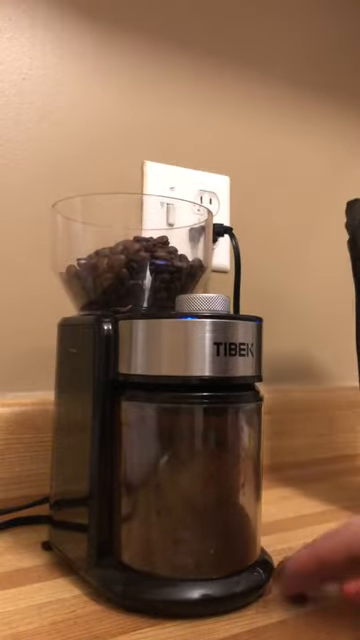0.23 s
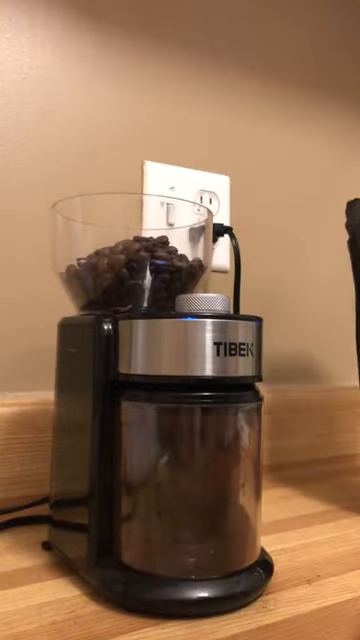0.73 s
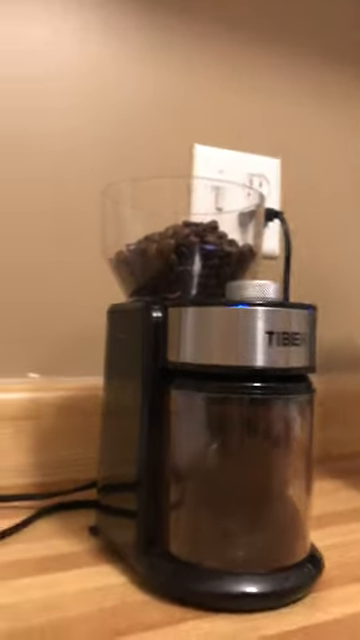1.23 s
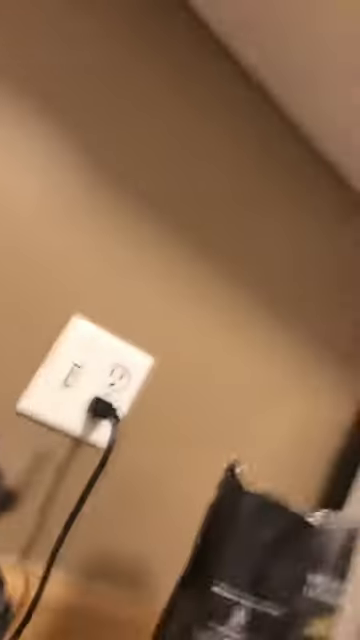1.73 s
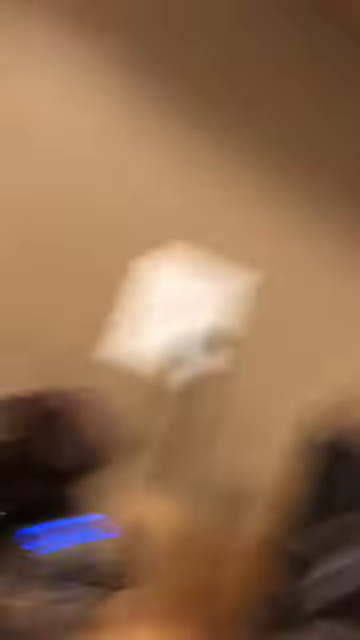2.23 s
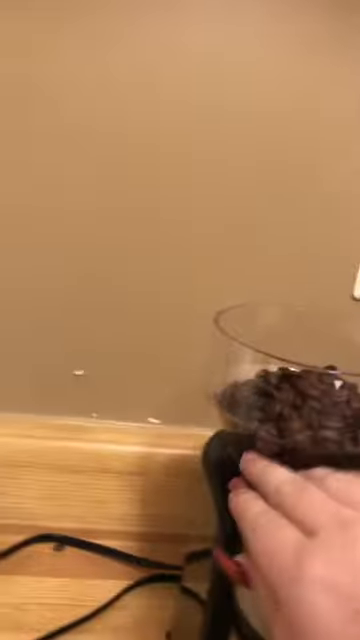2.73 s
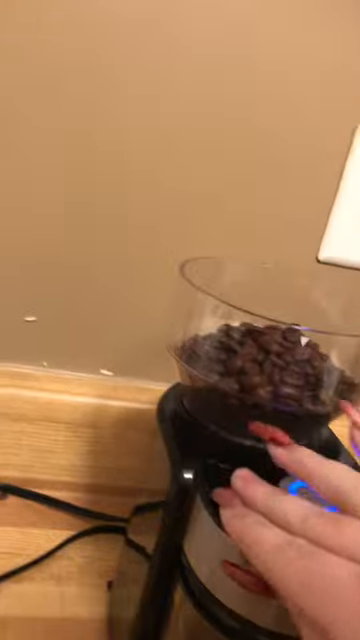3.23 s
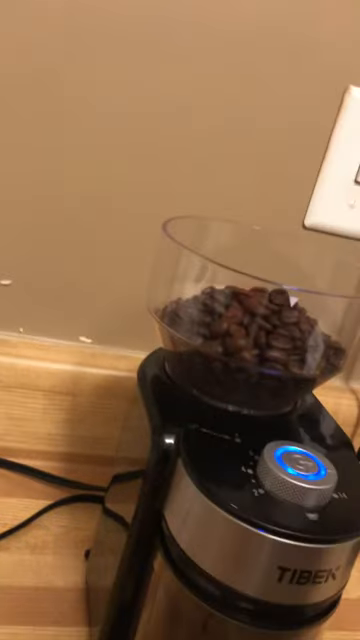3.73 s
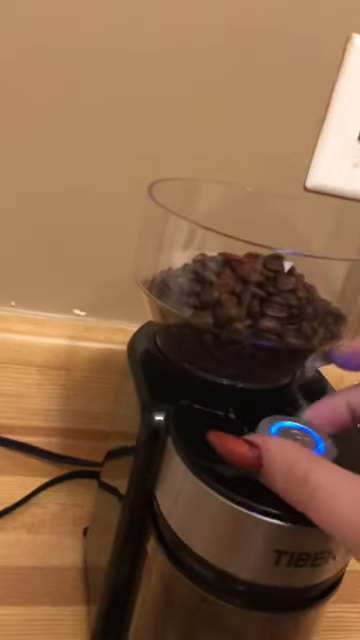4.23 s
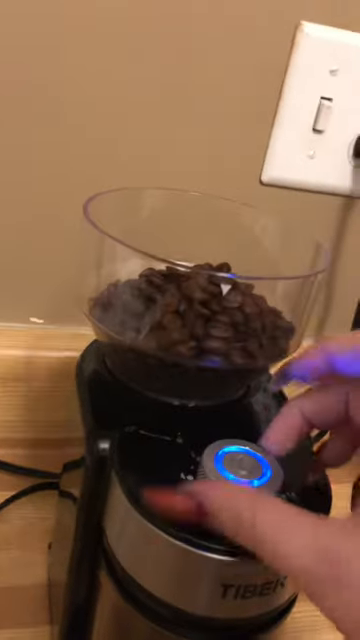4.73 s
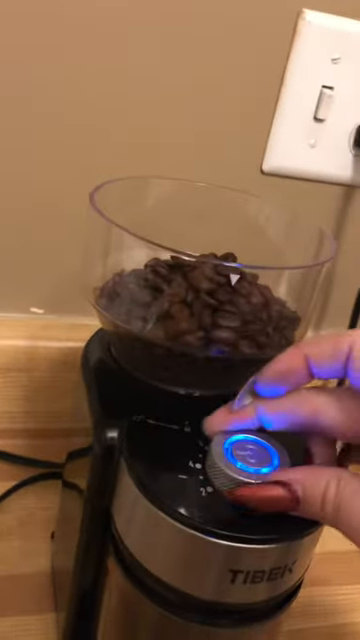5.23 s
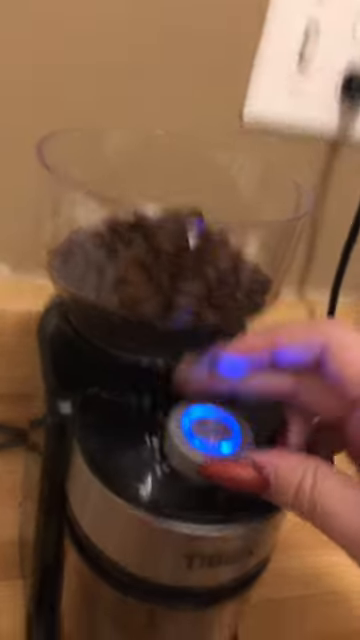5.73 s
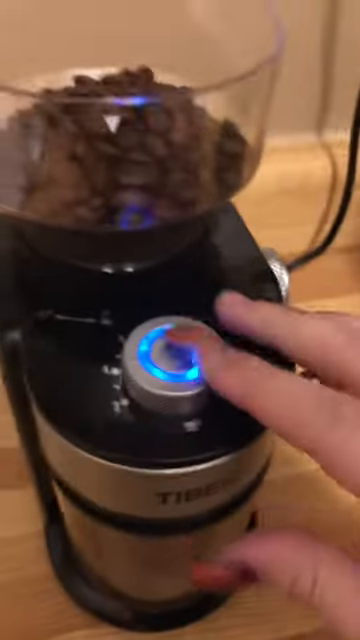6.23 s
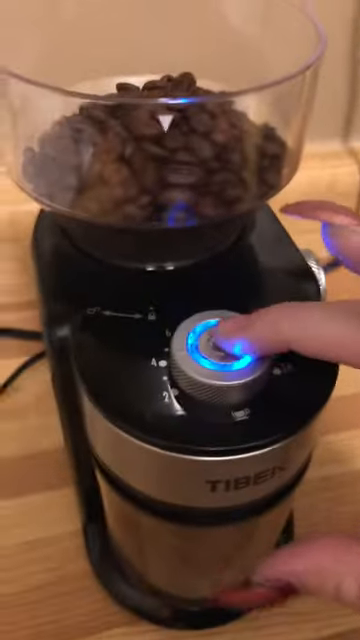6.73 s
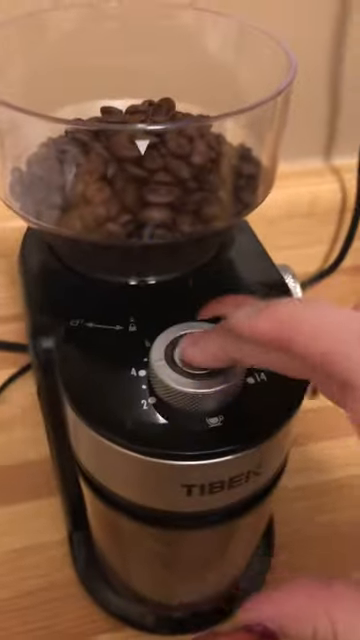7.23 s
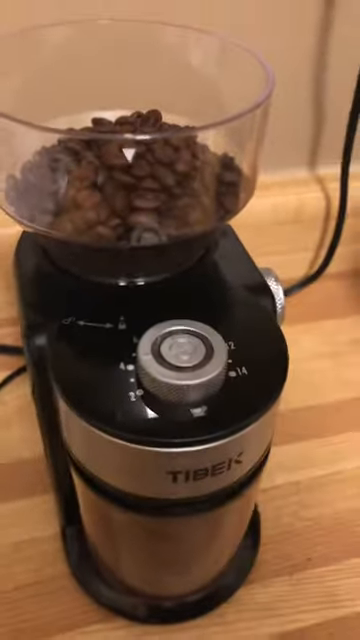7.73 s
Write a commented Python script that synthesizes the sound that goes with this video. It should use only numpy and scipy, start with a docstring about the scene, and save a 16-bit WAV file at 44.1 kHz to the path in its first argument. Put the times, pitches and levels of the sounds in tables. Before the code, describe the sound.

Mostly quiet handling at first: soft sliding skin and sleeve, muffled bumps. A small hard bean raps plastic three or four times, followed by bright nail taps. A dial zips through a fast burst of clicks, pauses, then clicks back, slowing to single teeth. More nails, a low button click, a short metallic spring ping, and low thumps. Close microphone, small room.

```python
"""Coffee grinder readied on a kitchen counter

Heard close up on a hand-held phone, in a small kitchen over still air, a steady hiss and a faint mains hum.
A stray bean bounces into the hopper and fingernails tick on the casing: noise through plastic resonances.
The grind dial ratchets up and back; the button goes down, its spring pings (decaying sines), it comes back.
Shaped noise makes the sliding sleeves and hand; soft bumps are short damped sines, squeaks wavering ones."""
import sys
import numpy as np
from scipy import signal
from scipy.fft import rfft, irfft, next_fast_len
from scipy.io import wavfile
from scipy.ndimage import uniform_filter1d

SR = 44100
rng = np.random.default_rng(int(sys.argv[2]) if len(sys.argv) > 2 else 0)


def generate_wav(sig):
    """Save sig (samples, or channels by samples) to the path in sys.argv[1] as 16-bit PCM at SR."""
    pcm = np.round(np.clip(np.atleast_2d(sig).T, -1, 1) * 32767).astype(np.int16)
    wavfile.write(sys.argv[1], SR, pcm)


N = 352359  # samples


def amp(db):
    """Decibels to gain."""
    return 10 ** (np.asarray(db) / 20)


def unit(x):
    """x at rms 1."""
    return x / np.sqrt(np.mean(x ** 2) + 1e-20)


def along(points, hz):
    """Values at hz, from (pitch_hz, value) points joined on a log frequency axis."""
    f, v = np.transpose(points)
    return np.interp(np.log(hz + 1), np.log(f), v)


def filtered(x, response):
    """x times a response of frequency."""
    m = next_fast_len(len(x) + 1024)
    gain = response(np.fft.rfftfreq(m, 1 / SR))
    return irfft(rfft(x, m) * gain, m)[:len(x)]


def coloured(x, spectrum):
    """x weighted by a (pitch_hz, level_db) spectrum, at rms 1."""
    return unit(filtered(x, lambda hz: amp(along(spectrum, hz))))


def clock(size=SR // 4):
    """Seconds from the start of a sound."""
    return np.arange(size) / SR


def add(track, s, sound):
    """Mix a sound into the track at s seconds."""
    part = track[round(s * SR):][:len(sound)]
    part += sound[:len(part)]


# Decay of the small kitchen around the phone: pitch_hz, t60_s
KITCHEN_DECAY = [(200, 0.44), (2000, 0.26), (5500, 0.22), (15000, 0.16)]


def in_room(sound, room_db):
    """A sound with the kitchen's answer: a noise tail in which treble dies first."""
    hz, t, z = signal.stft(rng.standard_normal(len(sound)), SR, nperseg=256)
    decay = amp(-60 * t / along(KITCHEN_DECAY, hz)[:, None])
    tail = signal.istft(z * decay * (t > 0), SR, nperseg=256)[1]
    answer = signal.fftconvolve(sound, tail / np.linalg.norm(tail))[:len(sound)]
    return sound + amp(room_db) * answer


# Colour of the still kitchen air at the microphone: pitch_hz, relative level_db
AIR_SPECTRUM = [(25, -10.5), (50, -2), (130, -3), (400, -6.5), (750, -15), (1400, -19.5), (3200, -27.5),
                (11600, -29.5), (16000, -30.5)]


def room_tone(air_db=-64, hum_db=-69, hum_hz=120):
    """Still air as steady coloured noise, and a faint mains hum as one sine."""
    hum = unit(np.sin(2 * np.pi * hum_hz * clock(size=N)))
    air = coloured(rng.standard_normal(N), AIR_SPECTRUM)
    return amp(air_db) * air + amp(hum_db) * hum


# Faint squeaks somewhere in the room: start_s, level_db, pitch_hz
FAINT_SQUEAKS = [(.885, -63, 2640), (7.351, -59, 2565)]


def squeaks(length=0.047, waver=0.014):
    """A thin tone of unsteady pitch that swells and fades over its length in seconds."""
    track = np.zeros(N)
    fade = np.sin(np.pi * np.minimum(clock() / length, 1))
    for s, db, hz in FAINT_SQUEAKS:
        wander = unit(uniform_filter1d(rng.standard_normal(len(fade)), 150))
        pitch = hz * (1 + waver * wander)
        tone = np.sin(2 * np.pi * np.cumsum(pitch) / SR)
        add(track, s, in_room(amp(db) * fade * tone, room_db=-13))
    return track


# drop at both ends of a movement, share of its length before the peak, roundness
SWELL_DROP_DB, SWELL_SHARE, SWELL_POWER = 9.5, 0.59, 1.33


def swell(peak, length):
    """Gain of one hand movement, per sample: it gathers speed up to the peak, then trails off."""
    t = clock(size=N) - peak
    away = np.maximum(-t / SWELL_SHARE, t / (1 - SWELL_SHARE)) / length
    return amp(-SWELL_DROP_DB * np.minimum(away, 10) ** SWELL_POWER)


def effort(rows):
    """Summed gain of (peak_s, length_s, level_db) movements."""
    return sum(amp(db) * swell(s, length) for s, length, db in rows)


def friction(grain_db, size=60):
    """Noise broken into tiny catches of random strength; size is their smoothing in samples."""
    catches = unit(uniform_filter1d(rng.standard_normal(N), size))
    return rng.standard_normal(N) * amp(grain_db * catches)


# Colour of skin and cloth sliding, and of the steady hiss: pitch_hz, relative level_db
SLIDE_SPECTRUM = [(150, -17), (350, -3), (900, -9.5), (1700, -6.5), (3500, -5), (7800, -12), (16000, -25)]
# Hand and sleeve sliding past the phone: peak_s, length_s, level_db, hiss_over_rustle_db
SLIDE_MOVES = [(0.146, 0.13, -64.5, -10), (0.38, 0.31, -52.5, -4.5), (0.627, 0.45, -61.5, -11.5),
               (1.147, 0.24, -70, -6), (1.669, 0.038, -59, -2), (1.95, 0.13, -56.5, 6),
               (2.167, 0.042, -51, -1.5), (2.854, 0.39, -63, 1), (3.22, 0.21, -74.5, 8),
               (5.68, 0.049, -56, -13), (6.018, 0.134, -66, 1), (6.11, 0.038, -56, 0.5),
               (6.419, 0.031, -58.5, 14), (7.301, 0.024, -54.5, -7), (7.72, .17, -60, 2)]
STEADY_HISS_DB = -73  # a faint, steady broadband hiss under everything


def rustle(grain_db=1.5):
    """Skin and cloth slide as broad rustle with a finer hiss above; the same noise is a faint steady hiss."""
    slide = coloured(friction(grain_db, size=200), SLIDE_SPECTRUM)
    low = filtered(slide, lambda hz: 1 / (1 + (hz / 5500) ** 6))
    broad, hiss = unit(low), unit(slide - low)
    track = amp(STEADY_HISS_DB) * slide
    for s, length, db, hiss_db in SLIDE_MOVES:
        track += amp(db) * swell(s, length) * (broad + amp(hiss_db) * hiss)
    return track


# Colour of the palm's rubbing: pitch_hz, relative level_db
PALM_SPECTRUM = [(120, -10.5), (250, 0.5), (520, 1.5), (800, -6.5), (1150, -13), (1500, -8.5), (2700, -24),
                 (4000, -15.5), (7000, -29), (15000, -44.5)]
# The palm rubbing on phone and grinder: peak_s, length_s, level_db
PALM_RUBS = [(.55, .4, -66), (.997, 0.027, -50), (1.13, 0.25, -61), (1.58, .12, -53), (1.76, .08, -56.5),
             (2.03, .18, -60.5), (2.165, .05, -54), (2.24, .04, -59), (3.34, .06, -56.5),
             (4.46, .08, -48.5), (7.76, .2, -61.5)]
# The hand's weight rocking the grinder: peak_s, length_s, level_db
HAND_LEANS = [(2.69, 0.066, -57), (2.79, 0.06, -56), (4.4, .28, -54), (4.72, .09, -53.5), (6.95, .35, -60)]


def grip():
    """The palm rubs dully, as catching noise, and the rocked grinder rumbles on the counter."""
    rub = coloured(friction(grain_db=3.5, size=900), PALM_SPECTRUM)
    counter = [(25, -10.5), (50, -3.5), (100, -4), (200, -15.5), (600, -47), (2000, -75.5)]
    rumble = coloured(rng.standard_normal(N), counter)
    return effort(PALM_RUBS) * rub + effort(HAND_LEANS) * rumble


# Soft bumps of hands on phone and grinder: start_s, peak level_db of the push, pitch_hz
HAND_BUMPS = [(.905, -50.5, 222), (.988, -44, 215), (1.027, -50, 200), (1.127, -49.5, 179),
              (1.655, -47, 75.4), (1.684, -47.5, 158), (2.002, -50.5, 197), (2.222, -48.5, 495),
              (3.32, -46.5, 135), (3.344, -46, 61), (6.93, -45, 125), (7.01, -46, 121), (7.659, -34.5, 94),
              (7.763, -29, 88.5), (7.801, -33, 47.6)]
BUMP_CYCLES = 19  # cycles in which a bump's decay falls 60 dB


def bumps(rough=0.68, rise=0.0024):
    """A soft push swells over a few milliseconds, then dies away as a low sine with rough rumble."""
    t, track = clock(), np.zeros(N)
    for s, db, hz in HAND_BUMPS:
        rumble = unit(filtered(rng.standard_normal(len(t)), lambda f: 1 / (1 + (f / (2 * hz)) ** 2) ** 2))
        push = (1 - np.exp(-t / rise)) ** 2 * amp(-60 * t * hz / BUMP_CYCLES)
        tone = np.sin(2 * np.pi * hz * t)
        add(track, s, amp(db) * push / push.max() * (tone + rough * rumble))
    return track


def resonance(modes, hz):
    """Response of a part's (pitch_hz, width_hz, level_db) modes, neighbours in opposite sign."""
    total = 0
    for k, (centre, width, db) in enumerate(modes):
        damping = 1j * hz * width
        total = total + (-1) ** k * amp(db) * damping / (centre * centre - hz * hz + damping)
    return total


def contact(grain, modes, bands, levels, thud_db, crack, ring_t60, ring_db):
    """A hard crack and short ring through a part's resonances, each register set to its own level."""
    t, out = clock(size=len(grain)), np.zeros(len(clock()))
    # the low thud follows the strength of the body register
    for band, db in zip(bands, [levels[0] + thud_db, *levels]):
        age = t * (np.mean(band) / 5000) ** .3  # plastic damps its treble sooner
        decay = np.exp(-(age / crack) ** 2) + amp(ring_db - 60 * age / ring_t60)
        ringing = filtered(grain * decay, lambda hz: resonance(modes, hz))
        part = signal.sosfilt(signal.butter(3, band, "band", fs=SR, output="sos"), ringing)
        # level is rms over the first hundredth of a second
        out[:len(part)] += amp(db) * part / np.std(part[:SR // 100])
    return out


# Registers of a blow, from thud through body and snap to edge: low_hz, high_hz
TAP_REGISTERS = [(200, 900), (900, 2500), (2500, 7500), (7500, 16000)]


def taps(rows, modes, body_db, softening, thud_db, crack, ring_t60, ring_db, room_db, shake=0):
    """Blows on one plastic part, each with fresh noise; a harder one has more edge and less body."""
    track = np.zeros(N)
    for s, db, hardness in rows:
        # a softer contact also ends lower in the treble
        top_hz = np.clip(19000 * amp(hardness / 2.7), 9000, 19000)
        lowpass = signal.butter(4, top_hz, fs=SR, output="sos")
        grain = signal.sosfilt(lowpass, rng.standard_normal(SR // 16))
        levels = [db + body_db - softening * hardness, db, db + hardness]
        thud = thud_db + shake * hardness  # a hard blow can shake the whole machine
        blow = contact(grain, modes, TAP_REGISTERS, levels, thud, crack, ring_t60, ring_db)
        add(track, s, in_room(blow, room_db))
    return track


# Moments when the fingers are busy: start_s, end_s
FIDGET_SPANS = [(3.72, 3.8), (3.949, 4.04)]
GRAZE_DB, GRAZE_HARDNESS_DB = -51.5, -8


def grazes(count=2, scatter_db=3.0):
    """Rows of faint nail ticks at random moments of each fidget."""
    rows = []
    for start, end in FIDGET_SPANS:
        for _ in range(count):
            rows.append((rng.uniform(start, end), rng.normal(GRAZE_DB, scatter_db), GRAZE_HARDNESS_DB))
    return rows


# Fingernails on casing and knob: start_s, level_db of the snap, hardness_db of edge over snap
NAIL_TICKS = [(.2246, -52, -9), (.4537, -54, -3), (.9885, -57.5, -20), (3.3164, -38, 2), (3.4335, -28.5, 7),
              (3.5262, -39, 0), (3.5875, -43, 2), (3.6161, -45, -2.5), (3.7152, -35, -0.5),
              (3.8355, -35, -3), (3.9284, -38, 1.5), (3.9924, -43.5, -5), (4.079, -47.5, -11),
              (4.1831, -53, -18), (4.4348, -38.5, -12), (4.4769, -48, -12), (4.5067, -44.5, -14),
              (4.652, -62, -2), (4.72, -60, -2), (5.6707, -48, -28), (5.829, -36, -1), (6.2682, -39, -8),
              (6.3773, -41.5, -7), (6.4344, -44, -3), (6.5699, -51.5, -13), (6.5987, -42, -3),
              (6.6411, -40.5, -4.5), (6.7636, -46.5, -14), (6.779, -51, -17), (6.9756, -50, -7)]
# Resonances of the plastic casing: pitch_hz, width_hz, relative level_db
CASING_MODES = [(366, 300, -15), (1600, 650, -5.5), (3060, 1270, -4), (4330, 1390, 2), (6800, 6400, -2),
                (9200, 2800, 0.5), (13100, 2400, -2.5)]


def nails():
    """Long fingernails tick on the casing, ringing its broad plastic resonances."""
    return taps(NAIL_TICKS + grazes(), CASING_MODES, body_db=-7.5, softening=0.344, thud_db=-9.5,
                crack=0.0021, ring_t60=0.054, ring_db=-3.0, room_db=-10.0, shake=.75)


# The bean bouncing in the hopper: start_s, level_db of the snap, hardness_db of edge over snap
BEAN_BOUNCES = [(2.5908, -27, -6), (2.6312, -31, -4.5), (2.7262, -27.5, -12), (2.7773, -47, -14)]
# Resonances of the hopper: pitch_hz, width_hz, relative level_db
HOPPER_MODES = [(1260, 400, -16.5), (1880, 920, -14.5), (3250, 730, -9), (4030, 700, -4), (5150, 660, 1.5),
                (6200, 1100, -7), (8500, 1800, -12.5), (13000, 4200, -22)]


def bean():
    """The dropped bean strikes the hopper several times, through the hopper's resonances."""
    return taps(BEAN_BOUNCES, HOPPER_MODES, body_db=-30.0, softening=1.63, thud_db=-22,
                crack=.0018, ring_t60=0.064, ring_db=-15.0, room_db=-11)


# The button going down and coming back: start_s, level_db of the snap, hardness_db of edge over snap
BUTTON_CLICKS = [(6.8483, -57, -29), (6.9075, -35, -6), (7.2248, -41, 3.5), (7.2328, -45, -4),
                 (7.2402, -43.5, -14)]
# Resonances of the switch: pitch_hz, width_hz, relative level_db
SWITCH_MODES = [(296, 117, -0.5), (747, 130, 1), (1140, 350, -6.5), (1450, 266, 3), (2020, 450, -1.5),
                (2930, 420, -13.5), (4200, 610, -9), (8700, 490, -10), (12000, 3500, -19)]


def button():
    """The button's contacts ring the switch, mostly in its low body."""
    return taps(BUTTON_CLICKS, SWITCH_MODES, body_db=7.5, softening=0.24, thud_db=-7.0,
                crack=0.0016, ring_t60=0.039, ring_db=-2.5, room_db=-15.0)


# Modes of the spring under the button: pitch_hz, relative level_db, t60_s
SPRING_MODES = [(720, -10, 0.2), (770, 5.5, 0.15), (2966, -11, 0.081), (3820, 3, 0.041), (4890, -12, 0.045),
                (5400, -5, 0.071), (6200, -16, .06)]


def spring(s=7.021, ping_db=-33, tick_db=-31.5, tick_t60=0.05):
    """A spring under the button pings with a noisy tick; its two lowest modes beat."""
    t, track = clock(), np.zeros(N)
    ring = sum(amp(db - 60 * t / t60) * np.sin(2 * np.pi * hz * t) for hz, db, t60 in SPRING_MODES)
    tick_spectrum = [(500, -9), (3000, -5.0), (7000, -0.5), (9000, -11.5), (16000, -14)]
    tick = coloured(rng.standard_normal(len(t)), tick_spectrum)
    onset = 1 - np.exp(-t / 0.0025)
    ping = amp(ping_db) * ring * onset + amp(tick_db - 60 * t / tick_t60) * tick
    add(track, s, in_room(ping, room_db=-15.5))
    return track


# Resonances of the grind dial: pitch_hz, width_hz, relative level_db
DIAL_MODES = [(1468, 290, -11.5), (2254, 516, -3.5), (2962, 740, -10), (5300, 856, -1), (8010, 970, 2.5),
              (9900, 1700, -2.5), (13200, 1100, -1.5), (14500, 600, 0), (15450, 440, 2.5)]
# Registers of a tooth's click, from thud through body and snap to edge: low_hz, high_hz
DIAL_REGISTERS = [(200, 950), (1230, 4200), (4200, 12000), (12000, 16500)]
TOOTH_SCATTER_DB = 0.37  # level spread from tooth to tooth
# the pawl sounds brighter low on the scale: mean, swing either way, tooth of changeover, teeth it takes
BRIGHT_DB, BRIGHT_SWING_DB, BRIGHT_TOOTH, BRIGHT_WIDTH = 0.3, 2.5, 12.8, 3
CLIMB_S, CLIMB_DB = .004, -32.5  # lead and relative level of the scrape up each tooth


def twist(path, db, stiffening, body_db=-13.7, snap_db=-4.0, edge_db=-2, impact=3, likeness=0.6,
          crack=.0019):
    """A pawl snaps into one tooth after another; its colour drifts as the dial turns."""
    track, pawl = np.zeros(N), rng.standard_normal(SR // 24)
    times, teeth = np.transpose(sorted(path, key=lambda point: point[1]))
    # a stiffer pawl lifts the pitch of its middle resonances
    modes = [(hz * stiffening if 2000 < hz < 4200 else hz, width, level) for hz, width, level in DIAL_MODES]
    for tooth in np.arange(teeth[0], teeth[-1] + 1):
        # each tooth's noise partly resembles its neighbour's
        fresh = rng.standard_normal(len(pawl))
        pawl = np.sqrt(likeness) * pawl + np.sqrt(1 - likeness) * fresh
        grain = pawl + impact * signal.unit_impulse(len(pawl))
        bright = BRIGHT_DB + BRIGHT_SWING_DB * np.tanh((BRIGHT_TOOTH - tooth) / BRIGHT_WIDTH)
        tilt = np.array([body_db - bright, snap_db - bright / 2, edge_db + bright / 2])
        levels = rng.normal(db, TOOTH_SCATTER_DB) + tilt
        snap = contact(grain, modes, DIAL_REGISTERS, levels, thud_db=-11.7, crack=crack,
                       ring_t60=0.049, ring_db=-8.0)
        s = np.interp(tooth, teeth, times)
        # the scrape up the tooth is a faint, early copy of its snap
        add(track, s - CLIMB_S, amp(CLIMB_DB) * snap)
        add(track, s, in_room(snap, room_db=-12.7))
    return track


# The dial's position up the scale; every whole tooth between clicks too: time_s, tooth
UP_PATH = [(4.2063, 7), (4.2259, 8), (4.2572, 10), (4.2954, 12), (4.3111, 13), (4.3239, 14), (4.3692, 18),
           (4.3858, 19)]
# The dial's position back down: time_s, tooth
DOWN_PATH = [(4.8346, 19), (4.8835, 17), (4.9062, 16), (4.943, 14), (4.9738, 12), (5.0546, 8), (5.1018, 6),
             (5.1648, 4), (5.2001, 3), (5.3122, 2), (5.4021, 1), (5.4568, 0)]
UP_DB, DOWN_DB = -20.5, -18.5  # base level of a click, before each register's offset


def dial():
    """The dial is spun up quickly, against the pawl, then eased back down."""
    up = twist(UP_PATH, UP_DB, stiffening=1.12, body_db=-12, snap_db=-1.2, edge_db=-2.0)
    down = twist(DOWN_PATH, DOWN_DB, stiffening=1)
    return up + down


def scene():
    """Everything at the one microphone."""
    background = room_tone() + squeaks()
    handling = rustle() + grip() + bumps()
    grinder = nails() + bean() + button() + spring() + dial()
    return (background + handling + grinder)[None]


TOP_HZ = 15950  # the phone's band limit


def record(dry):
    """The phone drops the deepest bass and cuts steeply above its band limit."""
    lean = signal.sosfilt(signal.butter(6, 37, "high", fs=SR, output="sos"), dry)
    return np.array([filtered(x, lambda hz: 1 / np.sqrt(1 + (hz / TOP_HZ) ** 200)) for x in lean])


dry = scene()
out = record(dry)
generate_wav(out)
```